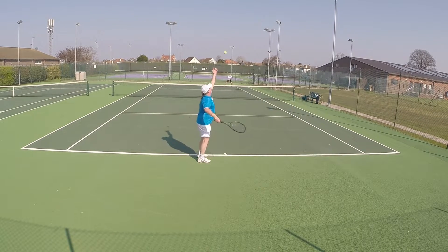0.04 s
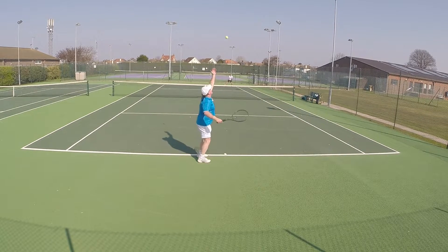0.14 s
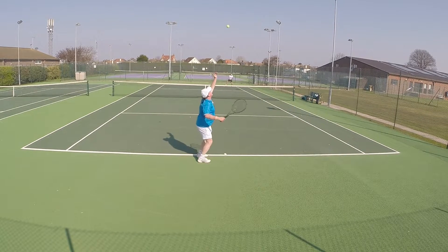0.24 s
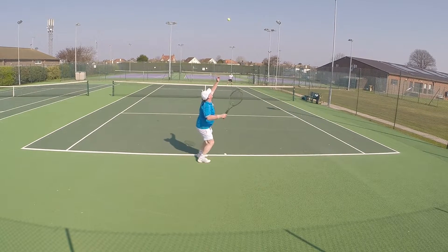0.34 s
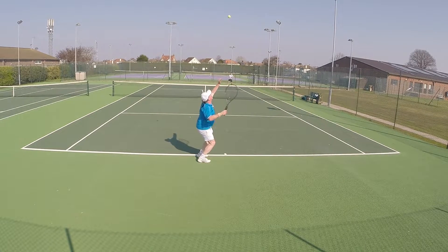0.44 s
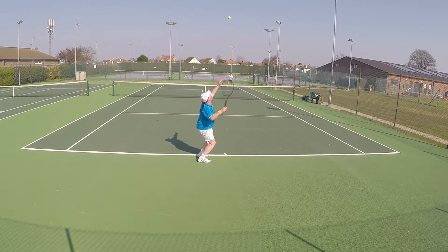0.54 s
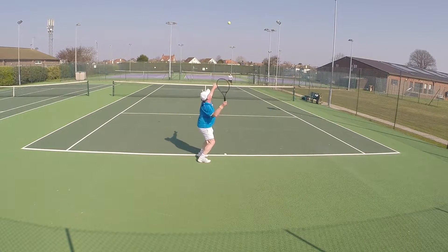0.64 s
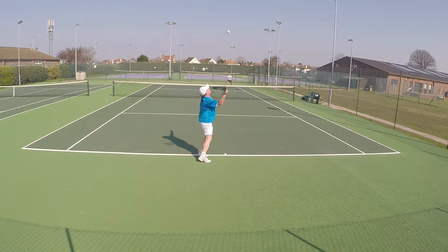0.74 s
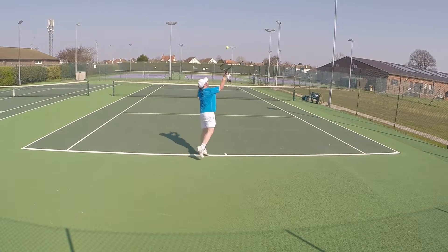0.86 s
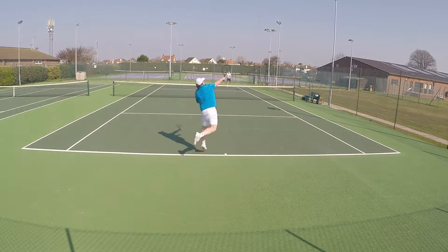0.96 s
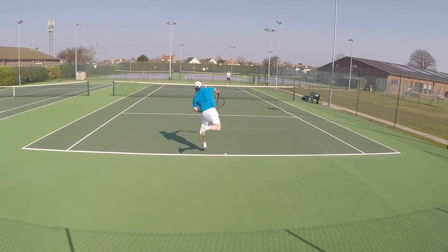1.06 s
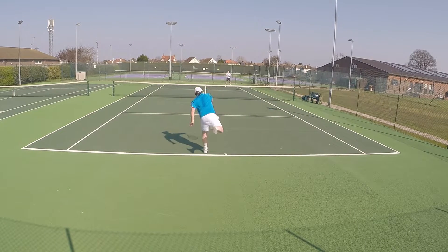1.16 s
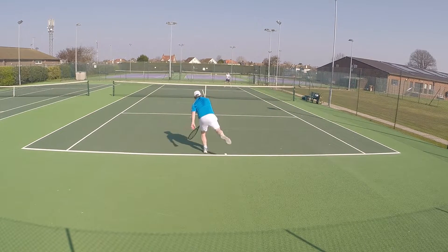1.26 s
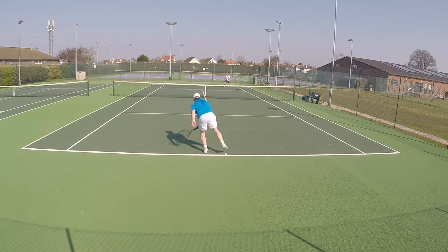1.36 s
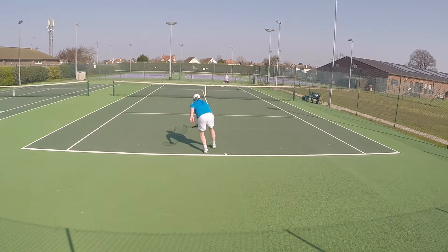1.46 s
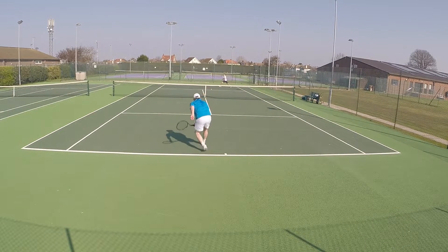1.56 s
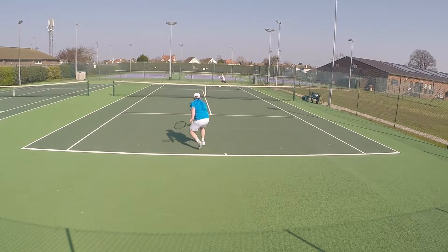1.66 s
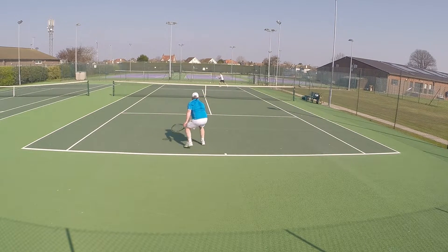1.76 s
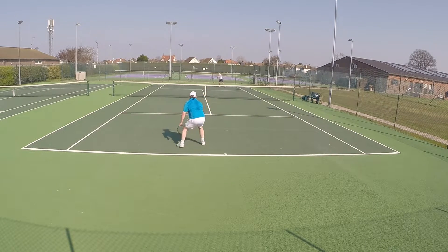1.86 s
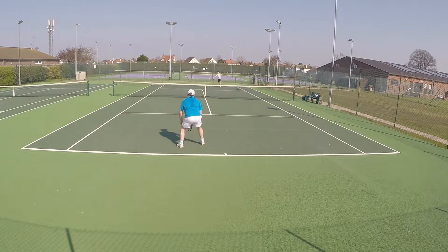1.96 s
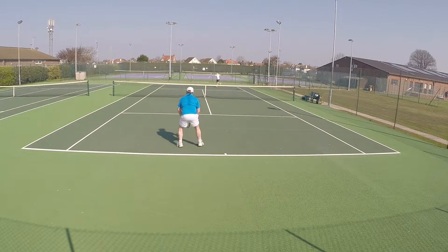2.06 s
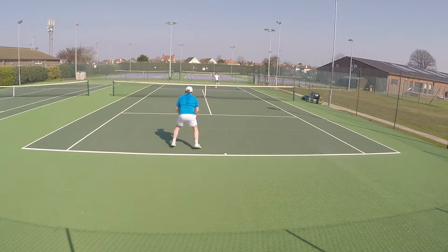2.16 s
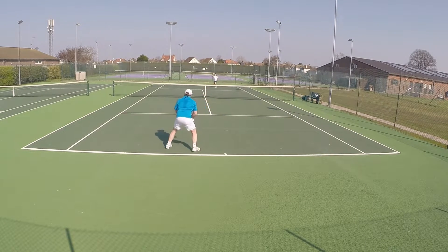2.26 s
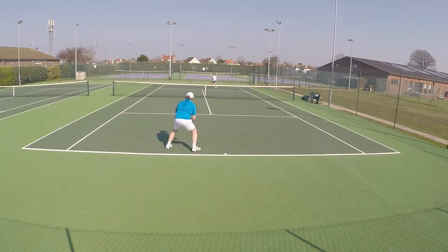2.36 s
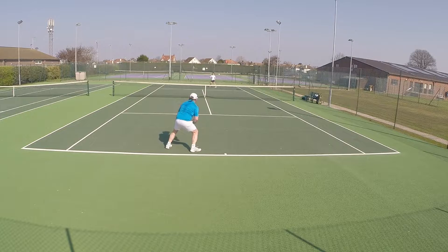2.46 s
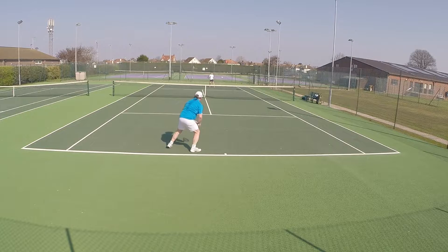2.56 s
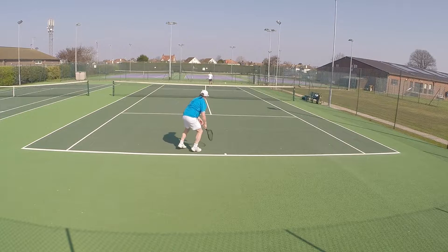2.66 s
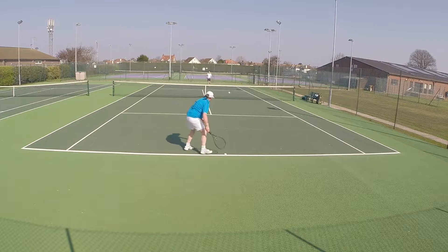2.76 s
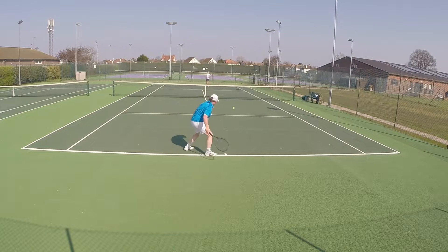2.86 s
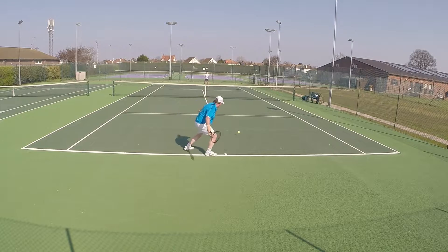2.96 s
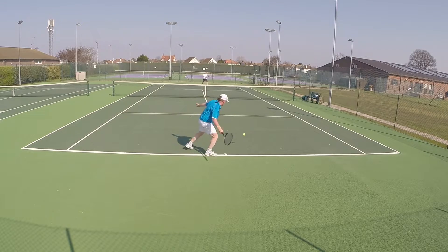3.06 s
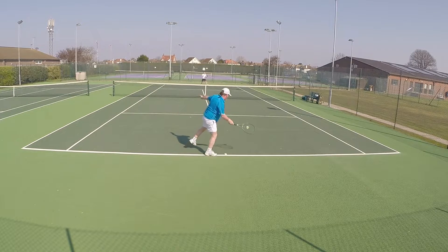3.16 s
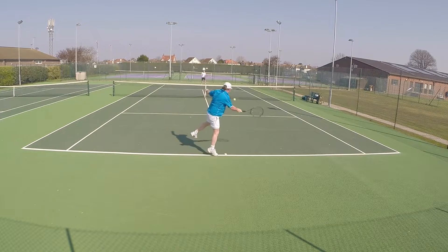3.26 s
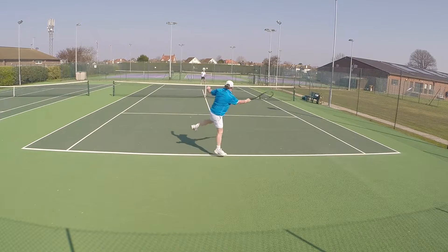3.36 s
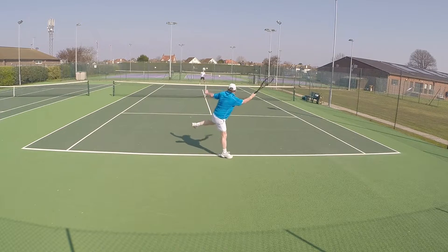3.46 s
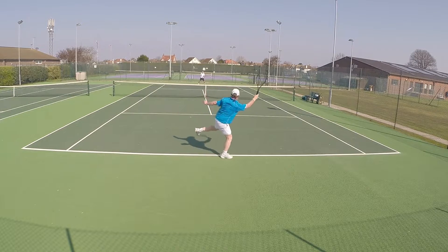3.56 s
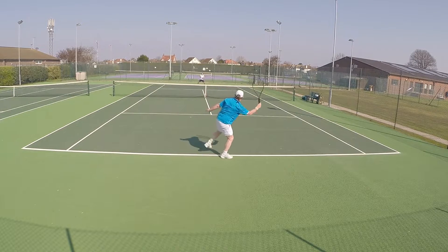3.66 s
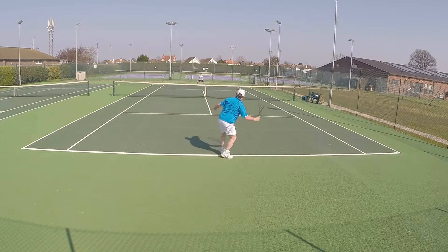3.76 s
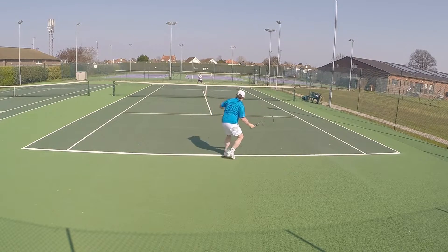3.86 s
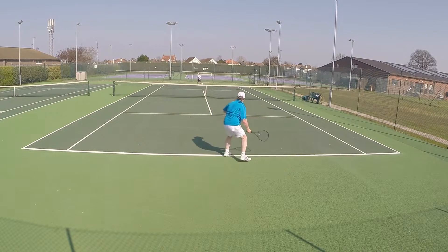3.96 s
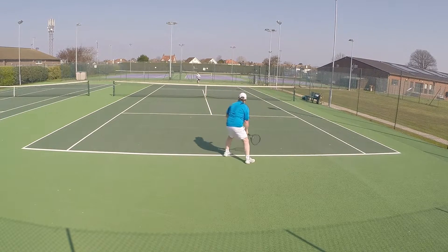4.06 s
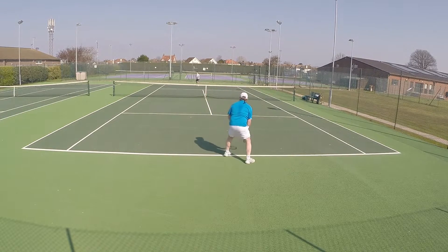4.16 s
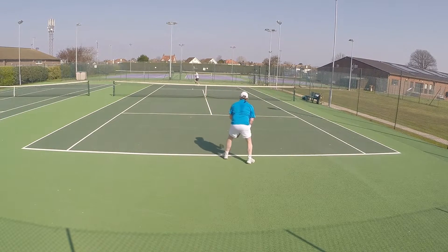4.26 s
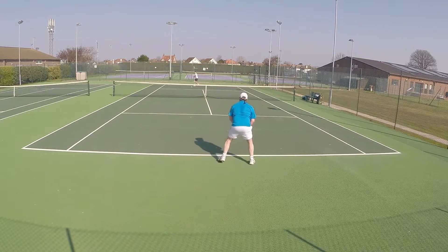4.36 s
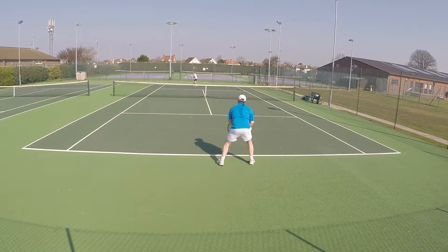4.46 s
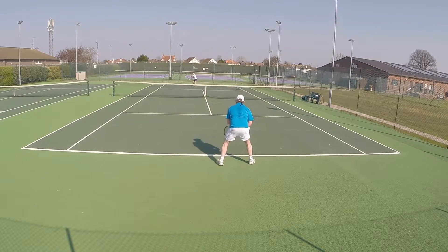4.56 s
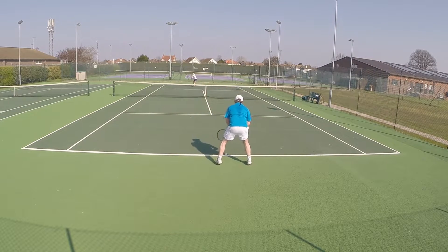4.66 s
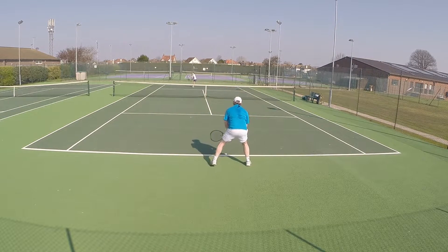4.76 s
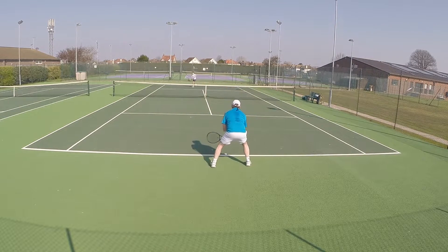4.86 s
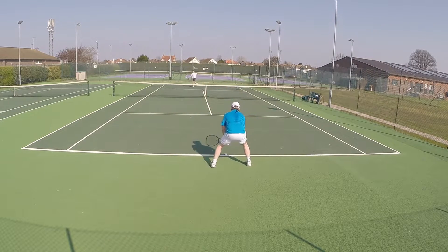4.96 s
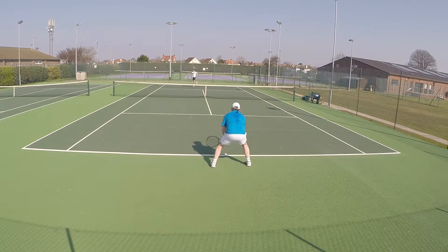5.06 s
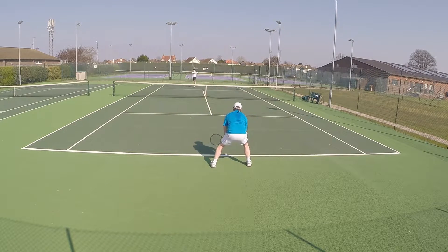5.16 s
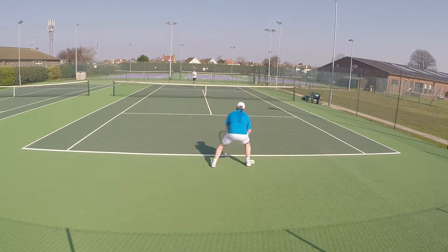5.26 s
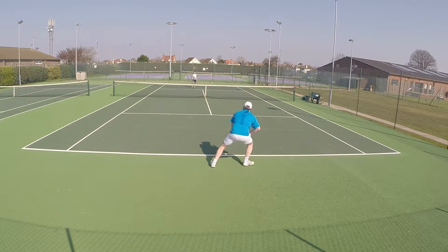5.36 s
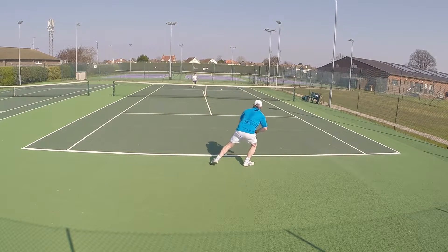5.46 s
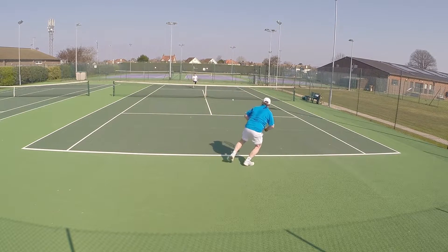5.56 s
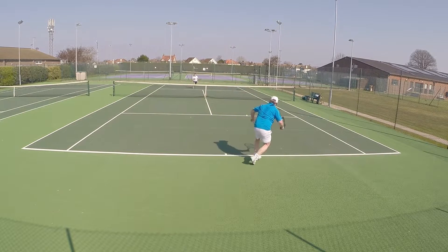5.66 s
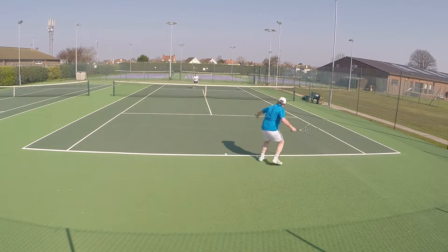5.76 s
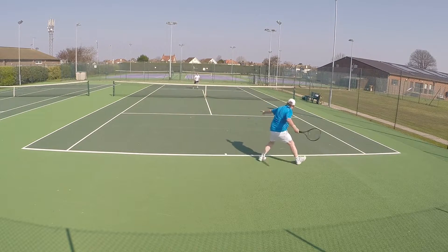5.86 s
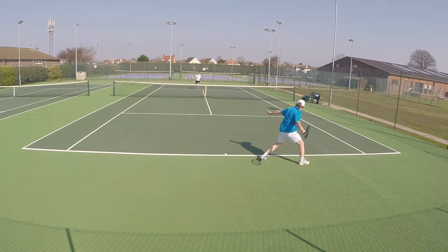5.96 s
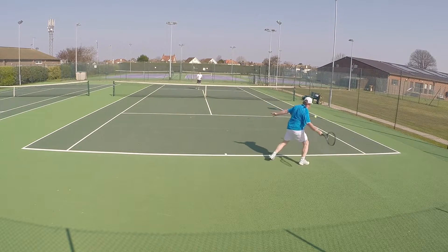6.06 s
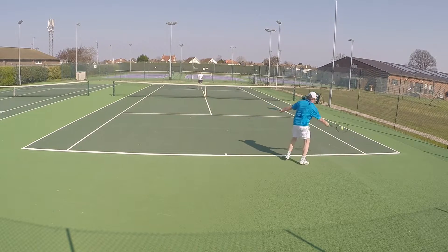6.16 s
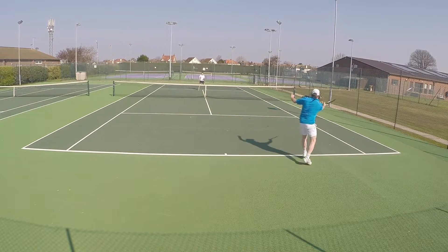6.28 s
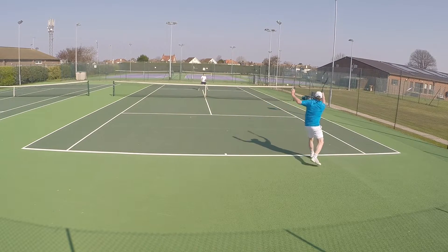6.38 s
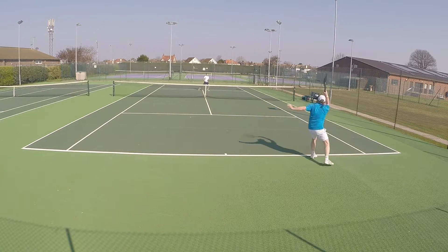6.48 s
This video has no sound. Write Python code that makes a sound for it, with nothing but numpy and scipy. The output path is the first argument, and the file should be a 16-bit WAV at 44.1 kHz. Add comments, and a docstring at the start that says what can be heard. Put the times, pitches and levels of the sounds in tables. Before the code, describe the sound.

Outdoors on a hard tennis court, heard from behind the baseline. A hollow knock precedes a sharp serve pop, then soft far pocks answer. A duller knock leads to a bright drive, followed by knocks, one very loud and woody. A final strong pop ends the rally. Air hiss and thin whine surge with near hits and sink almost to silence between.

```python
"""A tennis racket pops near the microphone, from behind the baseline of an outdoor hard court.
Each stroke rings damped string modes with a felt crack and a low push, then echoes once.
A hollow body knocks close by: damped modes, a thud and a shudder. Far pocks, ticks and scuffs answer.
Behind lie shaped-noise air, a thin electronic whine and faint chirps near 11.3 kHz;
a gate keyed by near impacts swells them up."""
import sys
import numpy as np
from scipy import signal
from scipy.fft import rfft, irfft, next_fast_len
from scipy.io import wavfile
from scipy.ndimage import uniform_filter1d, map_coordinates

SR = 44100
rng = np.random.default_rng(int(sys.argv[2]) if len(sys.argv) > 2 else 0)


def digitize_waveform(pressure):
    """Quantize a signal to 16-bit integers and store it at the path in sys.argv[1].

    Rows of a 2-D input are taken as channels; values are limited to [-1, 1].
    """
    field = np.atleast_2d(pressure).T
    bounded = np.clip(field, -1, 1)
    quanta = np.round(bounded * 32767).astype(np.int16)
    wavfile.write(sys.argv[1], SR, quanta)


N = 287531
TIME = np.arange(N) / SR  # s
AGE = np.arange(SR // 4) / SR  # s since a blow


def amp(db):
    """Decibels to gain."""
    return 10 ** (np.asarray(db) / 20)


def unit(x):
    """Scale x to rms 1."""
    return x / np.sqrt(np.mean(x ** 2) + 1e-20)


def fade(t60_s):
    """Exponential decay, 60 dB in t60_s."""
    return np.exp(-np.log(1000) * AGE / t60_s)


def sine(hz):
    """Sine over the age of a blow."""
    return np.sin(2 * np.pi * hz * AGE)


def hiss():
    """White noise as long as a blow."""
    return rng.standard_normal(len(AGE))


def add(track, start_s, sound):
    """Mix sound into track in place, cut at the track's end."""
    part = track[round(start_s * SR):][:len(sound)]
    part += sound[:len(part)]


def lowpass(x, hz, order=2):
    """Causal Butterworth lowpass."""
    return signal.lfilter(*signal.butter(order, min(hz, SR / 2 - 1), fs=SR), x)


def noise(gain):
    """Noise of rms 1, spectrum shaped by gain(f)."""
    size = next_fast_len(N + 8192)
    spectrum = rfft(rng.standard_normal(size))
    shaped = irfft(spectrum * gain(np.fft.rfftfreq(size, 1 / SR)), size)
    return unit(shaped[:N])


def band(centre_hz, width_hz):
    """Noise of rms 1 in a Gaussian band."""
    return noise(lambda f: np.exp(-2 * ((f - centre_hz) / width_hz) ** 2))


def wobble(rate_hz):
    """Smooth random curve, rate_hz knots a second."""
    knots = rng.standard_normal(int(N * rate_hz / SR) + 4)
    return map_coordinates(knots, [TIME * rate_hz])


def humps(rows):
    """Gain curve, one Gaussian hump per (t/s, level/dB, half length/s) row."""
    return sum(amp(db) * np.exp(-((TIME - s) / half_s) ** 2) for s, db, half_s in rows)


def ring(modes, pitch, scatter_db):
    """Damped modes, neighbours opposite in sign, strengths redrawn for every blow."""
    luck = rng.standard_normal(len(modes))
    total = np.zeros(len(AGE))
    for k, (hz, db, t60_s) in enumerate(modes):
        strength = (-1) ** k * amp(db + scatter_db * luck[k])
        total += strength * fade(t60_s) * sine(hz * pitch)
    return total


# Near strokes, a serve and two drives, one echo each: [t/s, string level/dB, string tilt/(dB/octave),
# push level/dB, crack level/dB, crack edge f/Hz, echo delay/s, echo level/dB, echo darkness 0-1]
STROKES = [(1.0851, -26.5, .5, -38, -32, 4200, .00403, -.5, 0.02),
           (3.333, -32, 5.5, -32.5, -29, 5050, .0178, 0, 1),
           (6.3550, -22.7, -1.2, -41, -28.5, 5650, .0166, -5.5, 0.51)]


def racket(pitch=1.006):
    """Each stroke pops and returns once: bright off the court, later and darker off the fence."""
    # a fully dark echo: strings tilt, share of pitch lost, crack loss
    dark_tilt_db_per_oct, dark_pitch_drop, dark_crack_db = -9.5, 0.171, -6.5
    echo_push_db = -10  # little low push returns
    out = np.zeros(N)
    for s, string_db, tilt_db, push_db, crack_db, edge_hz, delay_s, echo_db, dark in STROKES:
        add(out, s, pop(tilt_db, pitch, string_db, push_db, crack_db, edge_hz))
        echo = pop(
            tilt_db + dark_tilt_db_per_oct * dark,
            pitch * (1 - dark_pitch_drop * dark),
            string_db,
            push_db + echo_push_db,
            crack_db + dark_crack_db * dark,
            edge_hz)
        add(out, s + delay_s, amp(echo_db) * echo)
    return out


# Modes of strings and ball together, before pitch, tilt and scatter: [f/Hz, level/dB, t60/s]
RACKET = [(438, -23, 0.043), (804, -13, 0.028), (1099, -12.5, 0.054), (1440, -21, 0.065), (1734, -6, 0.025),
          (1878, 0, 0.037), (2070, -3.5, 0.022), (2595, -16.5, 0.057), (2994, -9.5, 0.0408),
          (3457, -13.5, 0.055), (3956, -30, 0.02), (4695, -15.5, 0.04), (5080, -12, 0.032),
          (6910, -19.5, 0.038), (7970, -24.5, 0.037)]


def pop(tilt_db_per_oct, pitch, string_db, push_db, crack_db, edge_hz,
        contact_s=0.00123, crack_t60_s=0.035, fizz_db=-7, fizz_hz=10000, push_hz=235, push_t60_s=0.039):
    """The ball sinks into the strings: they ring, the felt cracks, the air gets a low push."""
    modes = [(hz, db + tilt_db_per_oct * np.log2(hz / 1875), t60_s) for hz, db, t60_s in RACKET]
    strings = amp(string_db) * ring(modes, pitch, scatter_db=2)
    push = amp(push_db) * fade(push_t60_s) * sine(push_hz)
    felt = unit(lowpass(hiss(), edge_hz, order=6))
    fizz = amp(fizz_db) * lowpass(hiss(), fizz_hz)
    crack = amp(crack_db) * (felt + fizz) * fade(crack_t60_s)
    onset = 1 - np.exp(-AGE / contact_s)
    return (strings + push + crack) * onset


# Close hollow knocks, two landings each: [t/s, ring level/dB, contact sharpness f/Hz, first pitch ratio,
# thud level/dB, shudder level/dB, second landing delay/s, its ring level re first/dB]
KNOCKS = [(0.8560, -16, 1300, .93, -45, -36.5, 0.0059, -7),
          (3.0030, -30, 1900, .96, -39.5, -40.5, 0.00389, 4),
          (3.7583, -17.5, 1380, .99, -42, -36.5, .0107, -4.5),
          (3.7930, -25, 900, 1.03, -29, -46, .011, -7.5),
          (4.5354, -.7, 6840, .985, -40, -45, 0.0167, -23.5),
          (4.9910, -19.5, 620, .62, -26.5, -38.5, .0073, -2), (5.3960, -23.5, 400, .6, -29, -54, .018, -15)]


def knocks(thud_hz=130, thud_t60_s=0.037, shudder_t60_s=.22, shudder_rise_s=.007):
    """A hollow body lands with a ring and a low thud, lands again, and shudders on."""
    second_pitch, second_thud_db = .96, -8  # thud re first
    second_hz = 1700  # second sharpness: halfway, in octaves, from the first to this
    out = np.zeros(N)
    for s, ring_db, sharp_hz, pitch, thud_db, shudder_db, delay_s, second_db in KNOCKS:
        first = amp(ring_db) * landing(pitch, sharp_hz)
        thud = amp(thud_db) * fade(thud_t60_s) * sine(thud_hz)
        # a noise band stands for many weak crowded modes that outlast the main ones
        crowd = band(centre_hz=1060, width_hz=780)[:len(AGE)]
        shudder = crowd * fade(shudder_t60_s) * (1 - np.exp(-AGE / shudder_rise_s))
        add(out, s, first + thud + amp(shudder_db) * shudder)
        second = amp(ring_db + second_db) * landing(second_pitch, np.sqrt(sharp_hz * second_hz))
        add(out, s + delay_s, second + amp(second_thud_db) * thud)
    return out


# Modes of the knocked body, before pitch and scatter: [f/Hz, level/dB, t60/s]
HOLLOW = [(159, -25.5, 0.13), (323, -26.5, .075), (389.5, -32, 0.092), (499, -31.5, .08),
          (775.5, -9.5, 0.012), (945.6, -7, 0.033), (1143.3, -27.5, 0.073), (1274, -15.5, 0.043),
          (1470, -14, 0.043), (1620, -9.5, 0.012), (1942, -12, .011), (2189, -36.5, 0.054),
          (2575, -33.5, 0.02), (2866, -29.5, .024)]


def landing(pitch, sharp_hz, click_db=-33, click_hz=4500, click_t60_s=.025):
    """One contact clicks and rings the hollow body; a soft one loses the upper modes."""
    click = amp(click_db) * unit(lowpass(hiss(), click_hz)) * fade(click_t60_s)
    return lowpass(ring(HOLLOW, pitch, scatter_db=0.4) + click, sharp_hz, order=4)


def surroundings(x, wet_db=-29.5, t60_s=0.16, dull_hz=2200, rise_s=0.0072):
    """Fences and walls scatter a short dull tail: convolution with decaying noise."""
    tail = lowpass(hiss(), dull_hz) * fade(t60_s) * (1 - np.exp(-AGE / rise_s))
    return amp(wet_db) * signal.fftconvolve(x, tail / np.linalg.norm(tail))[:N]


# Distant bounces, strokes and steps: [t/s, level/dB, f/Hz]
FAR = [(1.7608, -38, 1950), (2.2800, -34.5, 1900), (2.299, -31.5, 1370), (3.19, -33.5, 1380),
       (4.4240, -33.5, 1250), (5.2306, -36, 1350), (5.8824, -35.5, 1460)]
# Thin bright ticks, level 7 dB above the noise rms before decay: [t/s, level/dB]
SNAPS = [(2.279, -35), (5.23, -35)]
# Shoes on the court: [t/s, level/dB, half length/s]
SCUFFS = [(1.472, -52.5, .05), (3.695, -48.5, 0.03)]


def court(pock_t60_s=0.031, grit_t60_s=0.015, snap_t60_s=0.013):
    """Far pocks are damped sines with grit; ticks and scuffing soles are noise bands."""
    out = np.zeros(N)
    for s, db, hz in FAR:
        pock = fade(pock_t60_s) * sine(hz)
        grit = unit(lowpass(hiss(), 3400)) * fade(grit_t60_s)
        add(out, s, amp(db) * (pock + 0.52 * grit))
    for s, db in SNAPS:
        tick = band(centre_hz=7500, width_hz=4800)[:len(AGE)] * fade(snap_t60_s)
        add(out, s, amp(db - 7) * tick)
    return out + humps(SCUFFS) * band(centre_hz=2420, width_hz=1300)


# Open air and microphone hiss, relative spectrum: [f/Hz, level/dB per Hz]
AIR = [(20, -2.5), (50, -1), (130, 0.5), (300, -6), (600, -11), (1000, -13.5), (1900, -17), (2400, -20),
       (3400, -20.5), (6000, -28.5), (9300, -33), (12400, -29), (13500, -32), (15500, -34.5)]
# Soft distant rush: [t/s, level/dB, half length/s]
SWELL = [(4.6, -52.5, 0.6544)]


def air(db=-42.5, gust_db=0.3, gust_rate_hz=5):
    """Shaped noise: an outdoor rush stirs slightly in the breeze; a soft swell passes far away."""
    hz, level_db = np.transpose(AIR)
    rush = noise(lambda f: amp(np.interp(np.log(f + 1), np.log(hz), level_db)))
    swell = humps(SWELL) * band(centre_hz=953, width_hz=430)
    return amp(db + gust_db * wobble(gust_rate_hz)) * rush + swell


# Steady bands of electronic whine: [f/Hz, width/Hz, rms level/dB]
WHINE = [(5020, 200, -65), (9990, 290, -68), (13990, 130, -73), (15050, 337, -72.5)]
# Two faint, thin chirps near 11.3 kHz: [t/s, level/dB, half length/s]
CHIRPS = [(3.038, -61.5, .028), (6.412, -65, .022)]


def whine(chirp_db=-65, chirp_rate_hz=50, tone_db=-63, tone_hz=13906, buzz_hz=60, flutter=.5):
    """Steady high noise bands and a buzzing tone; thin flickering chirps, most at random times."""
    steady = sum(amp(db) * band(hz, width_hz) for hz, width_hz, db in WHINE)
    buzz = 1 + flutter * np.sin(2 * np.pi * buzz_hz * TIME)
    tone = amp(tone_db) * buzz * np.sin(2 * np.pi * tone_hz * TIME)
    random_chirps = amp(chirp_db) * np.clip(2 * wobble(chirp_rate_hz) - 1, 0, 1)
    chirps = random_chirps + humps(CHIRPS)
    return steady + tone + chirps * band(centre_hz=11330, width_hz=110)


def gate(x, key, threshold_db=-35, depth_db=24.5, hold_s=0.047, release_s=0.1, attack_s=0.0098):
    """Opens just ahead of key peaks over threshold, holds, then sinks evenly in dB."""
    last_peak_s = np.maximum.accumulate(np.where(np.abs(key) > amp(threshold_db), TIME, -1))
    closed = np.clip((TIME - last_peak_s - hold_s) / release_s, 0, 1)
    # look ahead, then average over the attack
    ahead = np.interp(TIME + attack_s / 2, TIME, closed)
    closed = uniform_filter1d(ahead, max(int(attack_s * SR), 2))
    return x * amp(-depth_db * closed)


def scene():
    """Near impacts open the gate on the whole mix."""
    near = racket() + knocks()
    everything = near + surroundings(near) + court() + air() + whine()
    return gate(everything, key=near)[None]


def record(dry, top_hz=15500):
    """Brick-wall band limit: nothing is kept from top_hz up."""
    size = next_fast_len(N + SR // 2)
    kept = np.fft.rfftfreq(size, 1 / SR) < top_hz
    return irfft(rfft(dry, size) * kept, size)[..., :N]


dry = scene()
out = record(dry)
digitize_waveform(out)
```